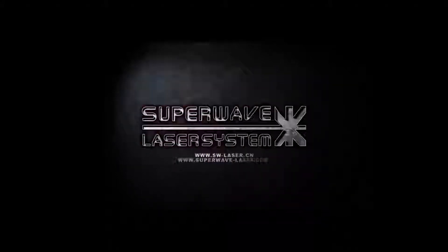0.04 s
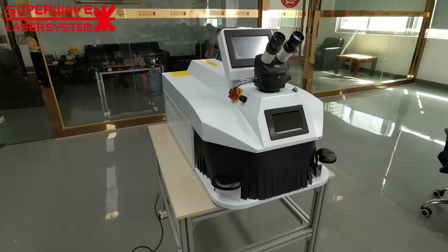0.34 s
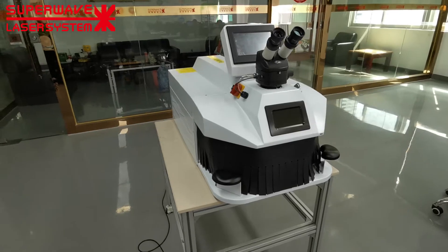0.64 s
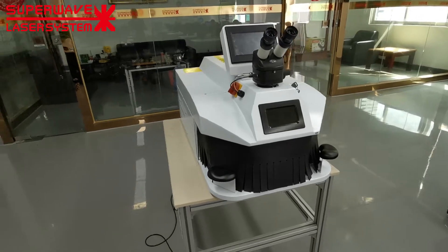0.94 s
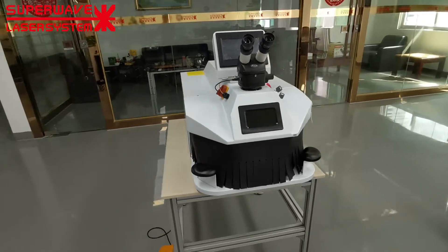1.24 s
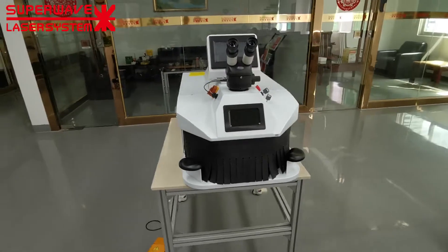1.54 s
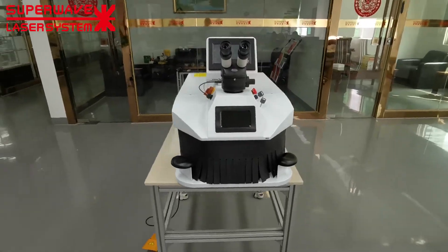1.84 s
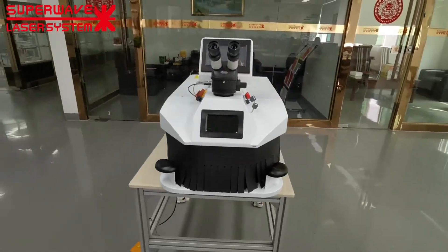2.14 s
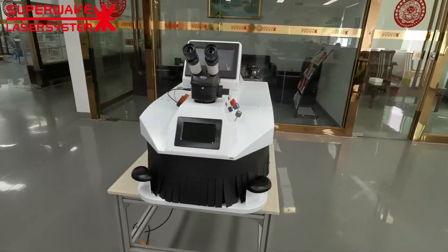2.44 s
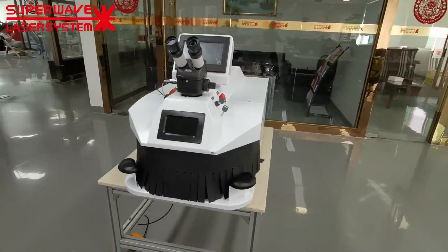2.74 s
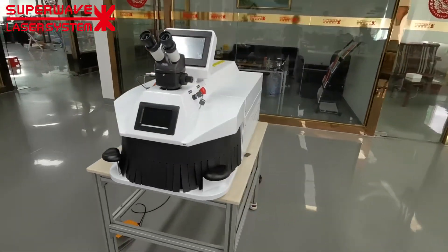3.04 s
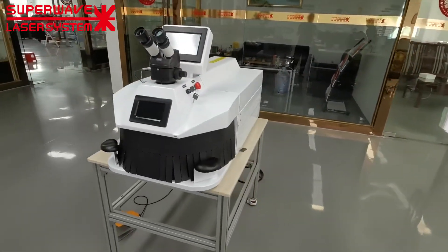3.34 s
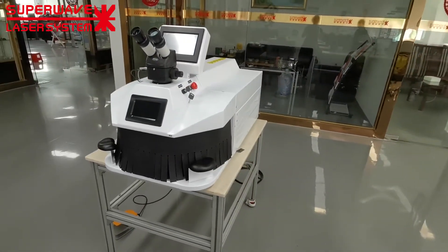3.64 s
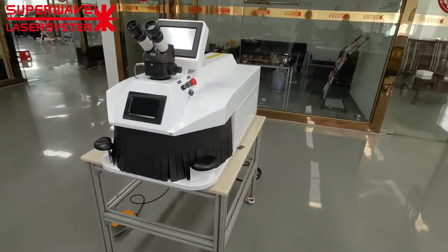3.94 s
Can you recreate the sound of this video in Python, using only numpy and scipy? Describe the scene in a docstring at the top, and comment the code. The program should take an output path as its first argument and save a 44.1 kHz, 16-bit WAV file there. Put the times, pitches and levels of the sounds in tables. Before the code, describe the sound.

Ventilation drones in a large hall, a dull rush and hiss with low machine hums that swell and fade as the microphone moves. About halfway, one short, sharp puff of air comes from the right, with a soft rumble.

```python
"""A large hall, in which ventilation and machines drone; the sound cuts in after a near silence. Moving air
gives broadband noise, a dull roar and a hiss. Fans and motors give narrow tones, and two deep ones swell and
fade as the microphone is carried through their standing waves. One short, sharp hiss, like a puff of air, comes
from the right; dull rumbles swell at the start and just after the puff."""
import sys
import numpy as np
from scipy.fft import rfft, irfft, next_fast_len
from scipy.io import wavfile
from scipy.ndimage import map_coordinates

SR = 44100
rng = np.random.default_rng(int(sys.argv[2]) if len(sys.argv) > 2 else 0)


def wav_record(signal):
    """Record a signal, one row per channel, as 16-bit PCM in the file named by sys.argv[1]."""
    frames = np.transpose(np.atleast_2d(signal))
    bounded = np.clip(frames, -1, 1)
    # unit amplitude maps onto the largest positive 16-bit level
    quanta = np.round(bounded * 32767).astype(np.int16)
    wavfile.write(sys.argv[1], SR, quanta)


N = 176400

# left-right coherence of the hall's sound field: f/Hz, coherence (0-1)
HALL_COHERENCE = [(25, 0.5), (70, 0.93), (180, 0.98), (350, 0.95), (700, 0.79), (1400, 0.29), (2500, 0.3),
                  (6000, 0.16), (12000, 0.28)]


def ventilation():
    """Flow noise: moving air radiates a continuous spectrum, heard as roar, hiss and a bright fizz."""
    # spectra of the three bands: f/Hz, spectral level/dB
    roar = [(11, -43), (18, -12), (43, -15), (60, -6), (93, -7), (118, -2.5), (158, -6), (228, -3),
            (263, -7), (297, -3.5), (343, -6), (448, -8.5), (561, -11.5), (609, -12), (936, -15.5),
            (1500, -14), (2400, -34.5), (3120, -57), (5280, -120)]
    hiss = [(900, -25), (1700, 3), (2300, 1.5), (3000, 2), (3900, 1.5), (4800, -2), (6000, -4),
            (7200, -11.5), (8300, -16.5), (9800, -15), (11000, -19.5), (12100, -15.5), (13500, -19.5),
            (15700, -20.5)]
    fizz = [(3500, -19), (5500, -9), (7100, -0.5), (8200, -14.5), (9800, -10.5), (12000, -12.5),
            (13500, -13), (15700, -16.5)]
    # strength of the flow noise: t/s, roar level/dB, hiss level/dB
    flow_levels = [(.36, -49.5, -54.5), (.7, -50.5, -54.5), (1.2, -50, -55), (1.7, -50, -55),
                   (2.05, -49, -55), (2.5, -50.5, -55), (2.9, -50, -55.5), (3.4, -50.5, -55.5),
                   (4, -50, -55.5)]
    # strength of its bright top: t/s, level/dB
    fizz_levels = [(.36, -86), (1.2, -76), (1.7, -70), (2.0, -63), (2.5, -62.5), (2.9, -65.5), (3.4, -67),
                   (4, -70)]
    roar_db, hiss_db = curves(flow_levels)
    fizz_db, = curves(fizz_levels)
    bands = [(roar_db, roar), (hiss_db, hiss), (fizz_db, fizz)]
    air = sum(amp(db + .35 * wobble(10)) * rush(spectrum, HALL_COHERENCE) for db, spectrum in bands)
    return left_lead(air, seconds=.000269)


def machines():
    """Standing waves: fan and motor tones fade at nodes and swell at antinodes, amid weaker tones."""
    # the two deep tones along the microphone's path: t/s, fan level/dB, motor level/dB
    walk = [(.36, -64, -75), (.58, -49.5, -76), (.66, -71, -79), (1.35, -67, -70), (1.53, -72, -51.5),
            (2.12, -60, -64), (2.28, -73, -59.5), (2.7, -66, -68), (3.0, -57, -51.5), (3.22, -54.5, -66),
            (3.7, -54, -57), (4, -59, -57.5)]
    # pitches of the weaker hums and the thin whines: f/Hz
    hum_pitches = [29, 190, 222.5, 295, 309, 392, 449, 599]
    whine_pitches = [2945, 5536, 5945, 6880, 7241, 11882]
    # spectral line of each hum: width/Hz, level/dB
    hum_lines = [(7.04, -66.5), (14, -67.5), (3, -65.5), (6, -62.5), (9, -64.5), (6, -70.5), (7, -67.5),
                 (4, -69.5)]
    whine_db = [-79, -82, -83, -81, -83, -86]
    fan_db, motor_db = curves(walk)
    fan = amp(fan_db) * tone(hz=73, width_hz=1.2, flutter_db=.7)
    motor = amp(motor_db) * tone(hz=117.7, width_hz=1.2, flutter_db=.7)
    hums = sum(amp(db) * tone(hz, width) for hz, (width, db) in zip(hum_pitches, hum_lines))
    whines = sum(amp(db) * np.array([tone(hz, width_hz=7) for _ in range(2)])
                 for hz, db in zip(whine_pitches, whine_db))
    return fan + motor + hums + whines


def puff():
    """Reverberation: a sharp hiss starts bright and darkens; the hall's weak tail adds to it in power."""
    # spectra of the quick top and the slower body: f/Hz, spectral level/dB
    top = [(7500, -43), (8700, -13.5), (9800, -7), (10900, -11), (11500, -7.5), (11900, 3), (12500, -7),
           (14000, -13), (15000, -18), (15600, -4.5)]
    body = [(1800, -32), (2700, -9), (3400, -4), (4400, -17), (5300, -4), (6300, -7.5), (7000, 1),
            (7350, -2.5), (7800, -32), (9000, -45)]
    # left-right coherence of the puff: f/Hz, coherence (0-1)
    coherence = [(2000, 0.1), (12000, 0.17)]
    start_s, tail_db = 2.221, -13
    out = np.zeros((2, N))
    for spectrum, db, rise, hold, t60 in [(top, -47, .009, .051, .3), (body, -49, .048, .043, .35)]:
        direct = envelope(start_s, rise, hold, t60)
        tail = amp(tail_db) * envelope(start_s, rise, hold, t60=1.8)
        out += amp(db) * np.hypot(direct, tail) * rush(spectrum, coherence)
    return left_lead(out, seconds=-.000309) * amp(.37 * wobble(90))


def rumbles():
    """Exponential decay: swells of low band-pass noise die away in the hall."""
    # dull swells: start t/s, rise/s, hold/s, T60/s, level/dB, lower edge f/Hz, upper edge f/Hz
    swells = [(.38, 0.046, 0.2, .06, -48, 202, 294), (2.255, 0.089, 0.067, 0.56, -48.5, 149, 790),
              (2.461, 0.032, .04, 0.86, -52, 150, 760)]
    out = np.zeros((2, N))
    for start, rise, hold, t60, db, low, high in swells:
        band = lambda hz: (hz / low) ** 2 / np.sqrt((1 + (hz / low) ** 4) * (1 + (hz / high) ** 8))
        out += amp(db) * envelope(start, rise, hold, t60) * noise(band, HALL_COHERENCE)
    return out


def faint_hiss():
    """Gated noise: a barely audible hiss with one tick, ending before the hall is heard."""
    # spectrum of the hiss: f/Hz, spectral level/dB
    spectrum = [(30, 9), (250, 0), (600, -4.5), (3000, -0.5), (7000, 4.5), (11500, 9.5), (12500, -25)]
    tick = amp(-76) * envelope(start=.084, rise=.00085, hold=.0017, t60=.029)
    gate = np.clip((.12 - clock()) / .01, 0, 1)
    return (amp(-85) + tick) * gate * rush(spectrum, HALL_COHERENCE)


def port_balance(x):
    """Level difference: the microphone's right port picks up more of the treble than the left."""
    # left relative to right: f/Hz, level/dB
    balance = [(100, -0.6), (1500, 0), (2800, -1.9), (4000, -5), (5500, -5), (7200, -9.5), (8200, -5.5),
               (9800, -8.5), (12000, -14), (13300, -4), (14800, 4)]
    return filtered(x, lambda hz: amp(np.array([[.5], [-.5]]) * along(balance, hz)))


def left_lead(x, seconds, above_hz=1720):
    """Time difference: treble reaches the left port earlier (later if seconds is negative)."""
    phase = lambda hz: np.pi * hz * seconds * (1 - 1 / (1 + (hz / above_hz) ** 8))
    return filtered(x, lambda hz: np.exp(1j * np.array([phase(hz), -phase(hz)])))


def tone(hz, width_hz, flutter_db=2.5):
    """Line broadening: a sine of rms 1 wanders at random in frequency and level."""
    frequency = hz + width_hz / 2 * wobble(2 * width_hz + 2)
    phase = 2 * np.pi * (np.cumsum(frequency) / SR + rng.random())
    return unit(np.sin(phase) * amp(flutter_db * wobble(width_hz + 2)))


def rush(spectrum, coherence):
    """Spectral shaping: stereo noise follows (f/Hz, level/dB) points and rolls off below the first."""
    return noise(lambda hz: amp(along(spectrum, hz)) * np.minimum(hz / spectrum[0][0], 1) ** 2, coherence)


def noise(gain, coherence):
    """Partial coherence: independent mid and side noises mix to a stereo pair of rms 1."""
    angle = lambda hz: np.arccos(np.clip(along(coherence, hz), -1, 1)) / 2
    response = lambda hz: gain(hz) * np.array([np.cos(angle(hz)), np.sin(angle(hz))])
    mid, side = filtered(rng.standard_normal((2, N)), response)
    return unit(np.array([mid + side, mid - side]))


def envelope(start, rise, hold, t60):
    """Growth and decay: power rises linearly, holds, then falls 60 dB in t60; times in s."""
    t = clock() - start
    return np.sqrt(np.clip(t / rise, 0, 1)) * amp(-60 * np.maximum(t - rise - hold, 0) / t60)


def filtered(x, response):
    """Linear filtering: the spectrum of x is multiplied by a complex frequency response."""
    size = next_fast_len(N + SR // 2)
    return irfft(rfft(x, size) * response(np.fft.rfftfreq(size, 1 / SR)), size)[..., :N]


def wobble(rate):
    """Random fluctuation: a spline through rate Gaussian knots a second."""
    return map_coordinates(rng.standard_normal(int(N * rate / SR) + 4), [clock() * rate])


def curves(rows):
    """Interpolation in time: one value per sample for each column after t/s."""
    times, *columns = np.transpose(rows)
    return [np.interp(clock(), times, column) for column in columns]


def along(points, hz):
    """Interpolation of (f/Hz, value) points on a logarithmic frequency axis."""
    frequencies, values = np.transpose(points)
    return np.interp(np.log(hz + 1), np.log(frequencies + 1), values)


def clock():
    return np.arange(N) / SR


def amp(db):
    return 10 ** (np.asarray(db) / 20)


def unit(x):
    return x / np.sqrt(np.mean(x ** 2) + 1e-20)


def scene():
    """Superposition: the hall's sources add and cut in together, briefly louder at first."""
    onset_s, fade_s, overshoot_db, settle_s = .358, .0029, 6, .036
    since = clock() - onset_s
    overshoot = amp(overshoot_db * np.exp(-np.maximum(since, 0) / settle_s))
    opening = np.clip(since / fade_s, 0, 1) * overshoot
    hall = ventilation() + machines() + rumbles() + puff()
    return opening * port_balance(hall) + faint_hiss()


def record(dry):
    """Band limiting: an ideal low-pass removes the highest treble."""
    return filtered(dry, lambda hz: hz < 15780)


dry = scene()
out = record(dry)
wav_record(out)
```